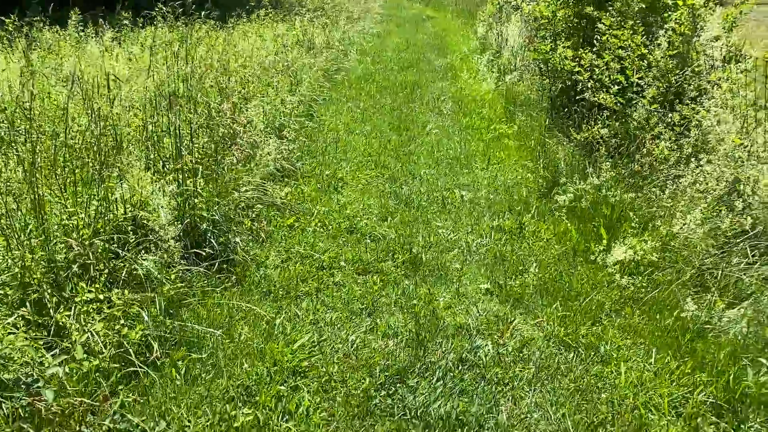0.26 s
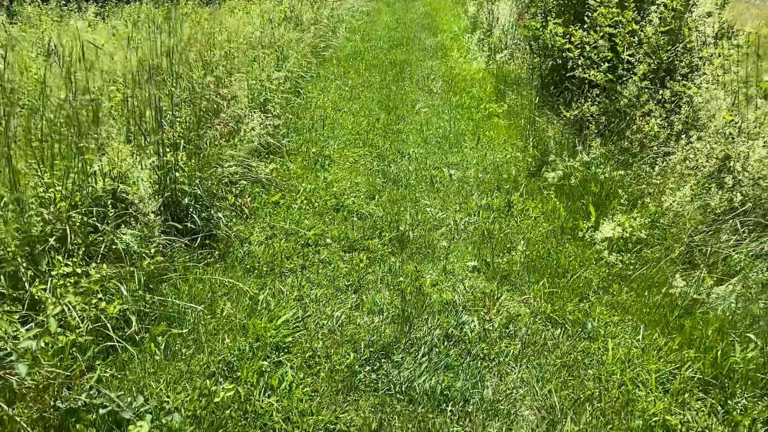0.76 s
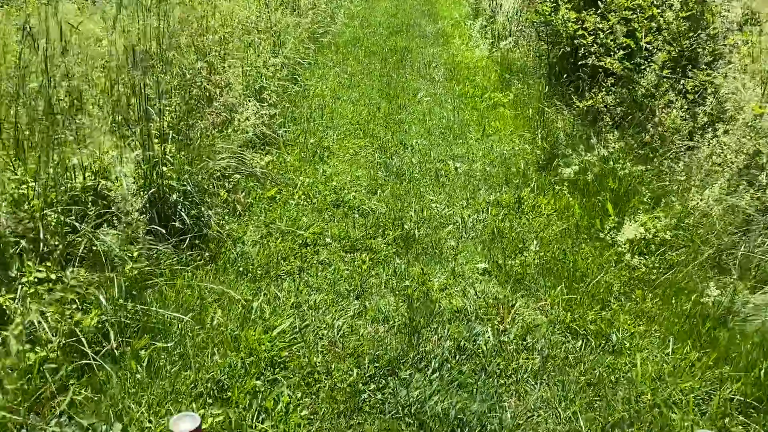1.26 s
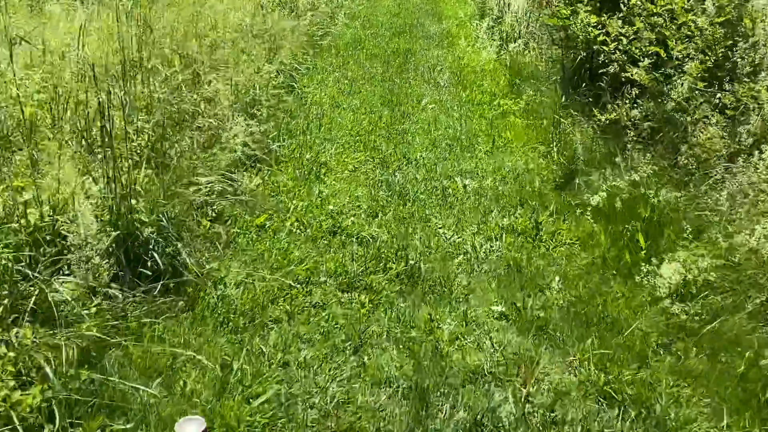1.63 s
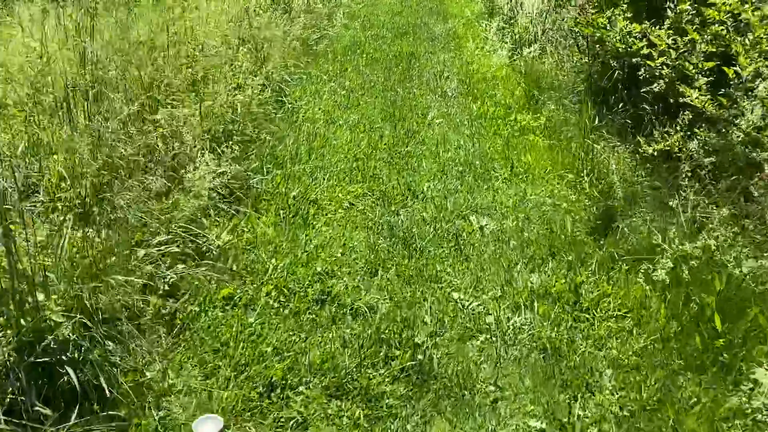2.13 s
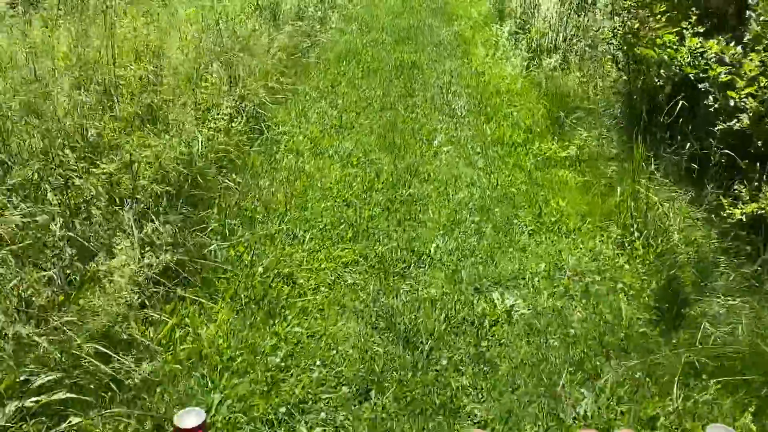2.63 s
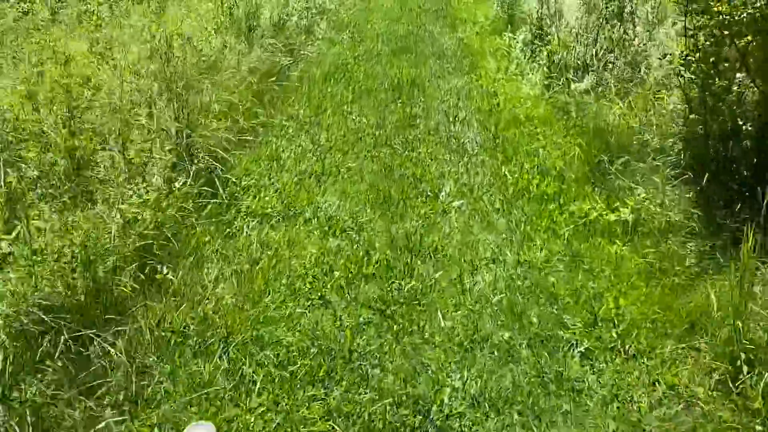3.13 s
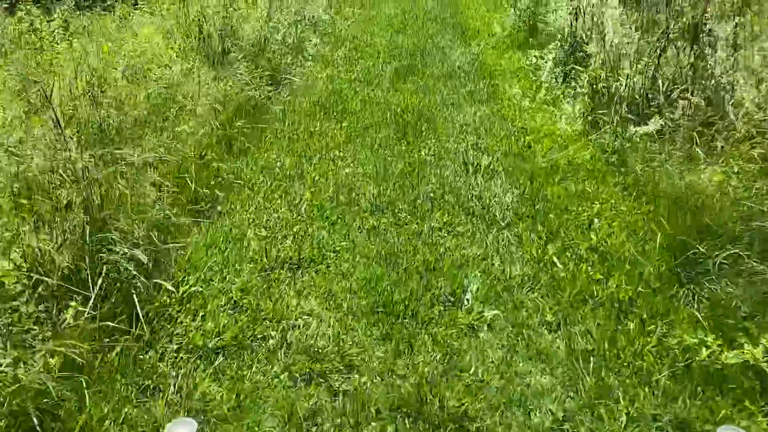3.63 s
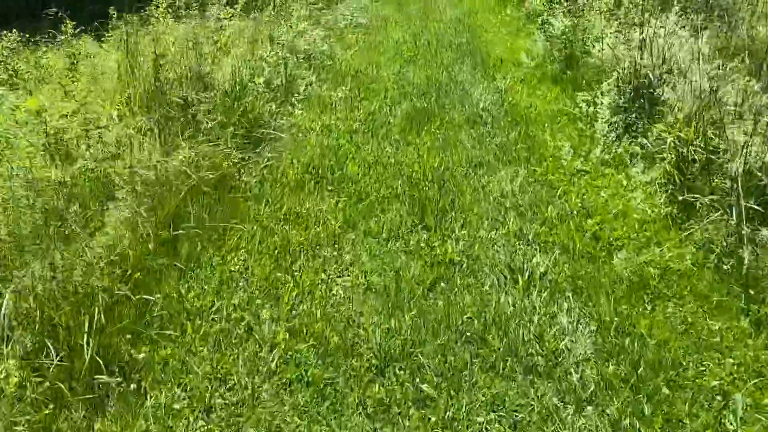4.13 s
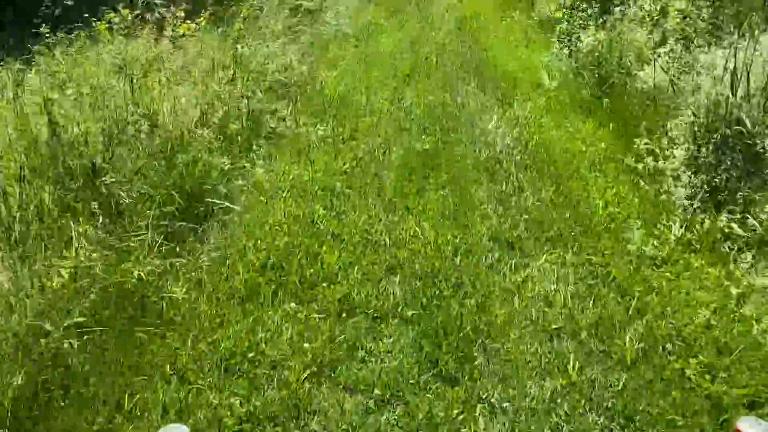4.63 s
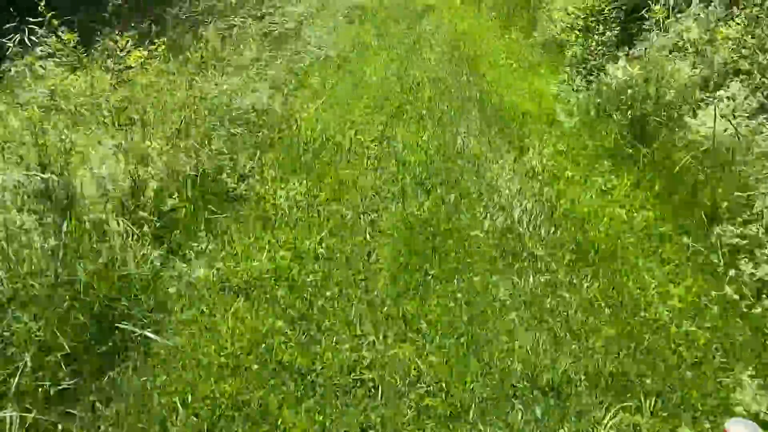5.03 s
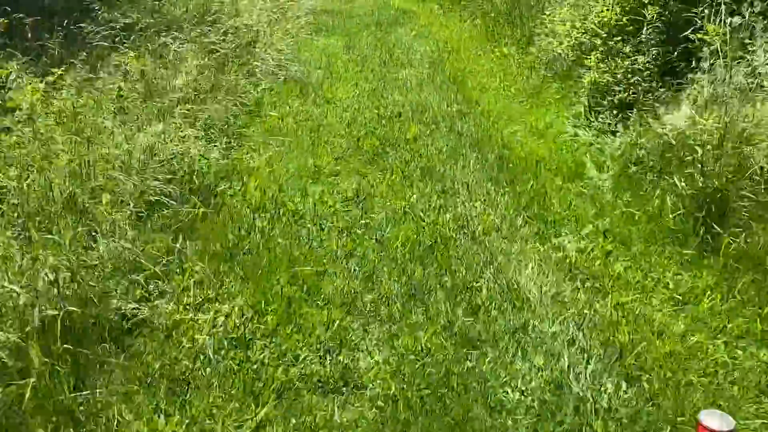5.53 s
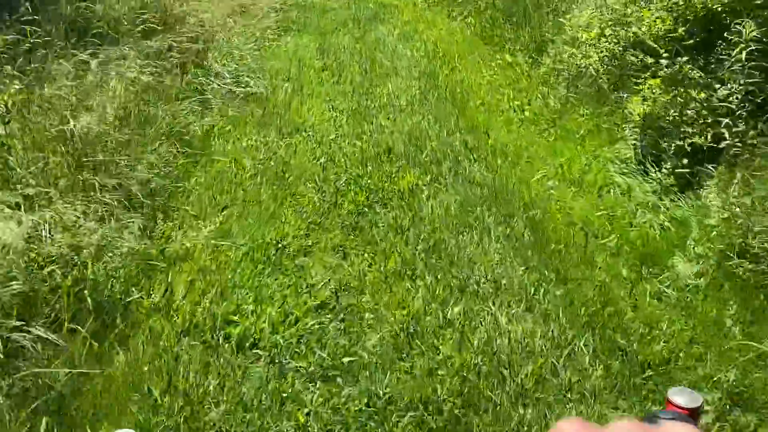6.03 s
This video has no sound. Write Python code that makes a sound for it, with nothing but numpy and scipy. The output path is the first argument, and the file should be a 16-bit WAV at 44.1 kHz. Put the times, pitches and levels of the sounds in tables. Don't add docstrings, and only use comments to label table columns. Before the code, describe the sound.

A ride-on mower runs throughout, heard from its seat outdoors on a phone, loud, close and slightly squashed at the peaks. The deck blades give a strong low hum near 110 Hz with buzzing overtones, beating slowly as three spindles drift apart. Under it lies a steady 58-59 Hz engine drone with a rough, uneven twin-cylinder texture. Wide low air roar and brighter blade rush surround it. From 0.6 s the pitch slides down slightly as grass thickens, lowest around 2.7 s, and the rush and hiss grow; it then partly recovers, wavering to the end. Faint hydraulic whines swell from about 0.6 to 3.4 s, with lower ones around 2.6-3.3 and 3.7-4.3 s and a last high touch near 4.6 s. Clippings hiss brightly, lifting at 0.9 s, most fully from 3 to 3.6 s, then briefly at 4.3 and 6.1 s. The drone continues to the cut at 6.3 s.

```python
import sys
import numpy as np
from scipy import signal
from scipy.fft import rfft, irfft, next_fast_len
from scipy.io import wavfile

SR = 44100
rng = np.random.default_rng(int(sys.argv[2]) if len(sys.argv) > 2 else 0)


def unload_audio(sound):
    columns = np.transpose(np.atleast_2d(sound))
    steps = np.round(np.clip(columns, -1, 1) * 32767)
    wavfile.write(sys.argv[1], SR, steps.astype(np.int16))


def attenuation_scalar(level_db):
    decades = np.asarray(level_db, float) / 20
    return 10 ** decades


N = 276948
SIDES = np.array([[1], [-1]])

# frequency_hz, share (0-1)
AIR_ALIKE = [(60, 0.54), (200, 0.81), (350, 0.9), (600, 0.26), (1000, 0.043), (2300, 0.33), (3400, 0.12),
             (4600, 0.76), (5800, 0.16)]
# frequency_hz, left_minus_right_db
PORT_TILT = [(60, -3), (110, -2), (200, 1.5), (380, -2), (700, -1.5), (1290, 4.5), (2380, 5), (4400, 4.5),
             (8120, 2.5), (15000, -1.5)]


def curves(table):
    time_s, *columns = np.transpose(table)
    return [np.interp(np.arange(N) / SR, time_s, column) for column in columns]


def on_log(table, hz):
    table_hz, values = np.transpose(table)
    return np.interp(np.log(hz + 1), np.log(table_hz), values)


def spells(rows, ramp_s):
    t = np.arange(N) / SR
    rise_db = 0
    for start_s, length_s, db in rows:
        nearest_end_s = np.minimum(t - start_s, start_s + length_s - t)
        rise_db = rise_db + db * np.clip(nearest_end_s / ramp_s + 0.5, 0, 1)
    return rise_db


def walk(rate, count=1, step=64):
    knots = rng.standard_normal((count, int(N / SR * 40) + 3))
    at = np.arange(N // step + 2) * step / SR * min(rate, 39)
    k = at.astype(int)
    ease = (1 - np.cos(np.pi * (at - k))) / 2
    return 1.15 * (knots[:, k] * (1 - ease) + knots[:, k + 1] * ease)


def fine(rows, step=64):
    rows = rows.astype(np.float32)
    part = np.arange(step, dtype=np.float32) / step
    filled = rows[:, :-1, None] + np.diff(rows)[:, :, None] * part
    return filled.reshape(len(rows), -1)[:, :N]


def turns(hz):
    return 2 * np.pi * np.cumsum(hz) / SR


def sing(rows, angle):
    angle = (angle % (2 * np.pi)).astype(np.float32)
    in_phase, quadrature = fine(rows).reshape(2, 2, N)
    return in_phase * np.cos(angle) + quadrature * np.sin(angle)


def smeared(angle, db, rate, steady, alike):
    both, apart = np.split(walk(rate, count=6), [2])
    alike = np.clip(alike, 0, 1)
    rows = np.sqrt(alike) * np.repeat(both, 2, axis=0) + np.sqrt(1 - alike) * apart
    rows[:2] += steady * np.sqrt(2)
    gains = np.tile(attenuation_scalar(db + 0 * SIDES), (2, 1)) / np.sqrt(1 + steady ** 2)
    return sing(rows * gains, angle)


def air(colour, share, octaves, flicker_db, rate):
    # frequency_hz, left_lead_half_turns
    port_lead = [(300, 0.15), (700, 0.35), (1400, 0.3), (2000, 0.5), (3400, 0.82), (4300, 0.13),
                 (5400, 0.42), (6800, 0), (7500, -0.6), (8550, -1), (10800, -2), (13250, -3), (15300, -3.5),
                 (15900, -1.5)]
    # centre_hz, width_hz, boost_db
    panels = [(549, 57, 4), (870, 63, 3), (1080, 61, 2), (610, 34, 0), (5430, 220, -1.5), (1230, 60, 0.5),
              (1440, 75, -3), (1530, 80, 2), (1880, 110, 3), (2470, 100, 2.5)]
    size = next_fast_len(N)
    hz = np.arange(size // 2 + 1) * SR / size
    both, left, right = rfft(rng.standard_normal((3, size), dtype=np.float32))

    share = np.clip(on_log(share, hz), 0, 1)
    lead = np.pi * np.interp(hz, *np.transpose(port_lead))
    pair = np.sqrt(share) * both * np.exp(0.5j * SIDES * lead)
    pair = pair + np.sqrt(1 - share) * np.array([left, right])

    ring_db = sum(db / (1 + (2 * (hz - f) / wide) ** 2) for f, wide, db in panels)
    colour_db = on_log(colour, hz) + ring_db + SIDES * on_log(PORT_TILT, hz) / 2
    pair = pair * attenuation_scalar(colour_db) * (hz < 15750) * (hz > 20)

    octave = np.clip(np.log2(hz / 25 + 1e-9), octaves[0], octaves[-1])
    out = 0
    for centre in octaves:
        window = np.clip(1 - abs(octave - centre), 0, 1)
        band = irfft((pair * window).astype(np.complex64), size)[:, :N]
        out = out + band * fine(attenuation_scalar(flicker_db * walk(rate)))
    return out / np.sqrt(np.mean(out ** 2))


def deck_roar(sag_hz):
    # frequency_hz, density_db (per Hz)
    roar_colour = [(25, -28), (45, -14), (75, -6), (130, -1), (250, 2), (450, 0.5), (580, -0.5),
                   (720, -4.5), (1000, -4), (1500, -12), (2500, -24.5), (4000, -39.5)]
    return attenuation_scalar(-20.5 + 0.92 * sag_hz) * air(roar_colour, AIR_ALIKE, range(7), 0.79, 9)


def blade_rush(sag_hz, clump_db, puff_db):
    # frequency_hz, density_db (per Hz)
    rush_colour = [(700, -12), (1500, 1), (2000, -1.2), (3000, -3), (4400, -8.5), (5300, -10),
                   (5800, -10.5), (6500, -18), (8000, -24)]
    level_db = -32.5 + 1.1 * sag_hz + 0.34 * clump_db + puff_db
    return attenuation_scalar(level_db) * air(rush_colour, AIR_ALIKE, range(6, 9), 0.9, 14)


def clippings(sag_hz, clump_db, puff_db):
    # frequency_hz, density_db (per Hz)
    hiss_colour = [(4000, -8.5), (6000, -4.5), (7000, -1.5), (9000, 2.5), (11000, -2.5), (13800, 2),
                   (14700, -8), (15800, -2)]
    # frequency_hz, share (0-1)
    hiss_alike = [(6000, 0.9), (7000, .92), (8400, 0.84), (10800, 0.97), (16000, .99)]
    swing_rad = 0.14
    hiss = air(hiss_colour, hiss_alike, range(8, 10), 0.5, 13) * fine(attenuation_scalar(0.93 * walk(14)))
    analytic = signal.hilbert(hiss.astype(np.float32), next_fast_len(N))[:, :N]
    spray = (analytic * np.exp(0.5j * SIDES * swing_rad * fine(walk(12)))).real
    return attenuation_scalar(-42.5 + 3.0 * sag_hz + clump_db + puff_db) * spray


def pump(angle):
    # piston_rate_multiple, resting_level_db, left_minus_right_db
    whine_tones = [(8, -54, 6), (10, -58.5, 6), (2, -50, -1)]
    # piston_rate_multiple, level_db, left_minus_right_db
    hum_tones = [(4, -51, 7), (5, -49.5, 9), (6, -52.5, -4), (7, -53, 5), (9, -54.5, 3), (15, -64, 11)]
    # start_s, length_s, rise_db
    effort = [
        [(.55, .75, 8.5), (1.38, .1, 6), (1.74, .22, 9.5), (2.42, .14, 12), (2.66, .2, 5), (3.55, 0.31, 7.5),
         (4.55, 0.18, 6)],
        [(.62, .3, 6), (.96, 0.14, 14.5), (1.75, .3, 8), (2.08, 0.18, 13), (2.45, 0.92, 6)],
        [(0, 0.34, 4), (2.6, .25, 17), (3.1, .2, 11), (3.7, .62, 14.5)],
    ]
    second_angle = 0.9932 * angle + 0.14 * fine(walk(25))[0]

    def shaft(multiple):
        return multiple * (angle if multiple < 8 else second_angle)

    out = 0
    for pushes, (multiple, db, pan_db) in zip(effort, whine_tones):
        tone = smeared(shaft(multiple), db + SIDES * pan_db / 2, 34, 2.0, 0.6)
        out = out + attenuation_scalar(spells(pushes, 0.077)) * tone
    for multiple, db, pan_db in hum_tones:
        out = out + smeared(shaft(multiple), db + SIDES * pan_db / 2, 12, 0.5, 0.5)
    return out


def engine(hz, angle):
    # cycles_per_two_turns, level_db (relative to the crank line)
    exhaust = [ (1, -26), (3, -13), (5, -10), (6, -13), (8, -11), (9, -8), (10, -8), (12, -11), (13, -11),
               (18, -14), (24, -14), (30, -14), (31, -17), (36, -15), (39, -21), (41, -22), (43, -20),
               (48, -22), (56, -23), (60, -23), (62, -21)]
    orders = 0
    for k, db in exhaust:
        tilt_db = SIDES * on_log(PORT_TILT, k * hz.mean() / 2) / 2
        orders = orders + smeared(k * angle / 2, db + tilt_db, 4, 0.48, 0.95 - k / 30)
    crank_line = np.sqrt(2) * np.cos(angle + 0.03 * SIDES)
    return attenuation_scalar(-27) * (crank_line + orders)


def blades(angle):
    # first_db, second_db, third_db
    spindles = [(-16, -24.5, -22), (-18.5, -50, -25), (-31, -19.5, -29), (-28, -27.5, -39.5)]
    # turn_rad, left_lead_rad, left_minus_right_db
    pulse = [(-0.031, 0.081, -0.5), (-1.9, 0.13, 0.5), (-1.78, .01, -1), (0.33, 0.12, -0.5)]
    # time_s, second_lead_passes, third_lead_passes
    slip = [(0.0, -0.1, 0.28), (0.52, -0.093, 0.21), (1.05, -0.122, 0.15), (1.57, -0.12, 0.096),
            (2.09, -0.14, -0.03), (2.62, -0.15, -0.13), (3.14, -0.15, -0.16), (3.66, -0.15, -0.33),
            (4.19, -0.129, -0.41), (4.71, -0.1, -0.46), (5.23, -0.11, -0.48), (5.76, -0.11, -0.63),
            (6.28, -0.11, -0.68)]
    # blade_multiple, level_db, left_minus_right_db
    upper = [(4, -33, -2.5), (5, -36, 0), (6, -39, 3.5), (7, -43, 0), (8, -45, 3), (10, -45, -1),
             (11, -47, -10), (12, -47, 13.5)]
    shake, throb_db = fine(walk(30, count=2))
    sway_db = fine(walk(5.5, count=4))
    leads = [np.zeros(N)] + curves(slip)
    out = 0
    for k, (levels_db, (turn, lead, pan_db)) in enumerate(zip(spindles, pulse), 1):
        beat = sum(attenuation_scalar(db) * np.exp(2j * np.pi * k * passes) for db, passes in zip(levels_db, leads))
        spin = np.exp(1j * (k * (angle + 0.031 * shake) + turn))
        tone = (beat * spin * np.exp(0.5j * SIDES * lead)).real
        drift_db = k * (0.31 * throb_db + 0.29 * sway_db[k - 1])
        out = out + np.sqrt(2) * attenuation_scalar(SIDES * pan_db / 2 + drift_db) * tone
    for k, db, pan_db in upper:
        out = out + smeared(k * angle, db + SIDES * pan_db / 2, 9, 0.34, 0.22)
    return out


def scene():
    # time_s, crank_hz
    crank = [(0, 59.3), (.6, 59.16), (1.4, 58.5), (2.2, 57.94), (2.75, 57.7), (3.3, 58.2), (3.8, 58.15),
             (4.4, 58.52), (5.3, 58.33), (5.7, 58.54), (6.28, 58.1)]
    # start_s, length_s, rise_db
    clumps = [
        (.9, .15, 2),
        (2.1, .15, 0.5),
        (2.95, 0.627, 2),
        (3.15, .15, 2),
        (4.32, .12, 1.5),
        (5.4, .3, -0.5),
        (6.05, .25, 1),
    ]
    hz, = curves(crank)
    angle = turns(hz)
    sag_hz = 59.2 - hz
    clump_db = spells(clumps, 0.04)
    puff_db = 0.42 * (np.cos(angle / 2) + np.cos(angle))

    mix = deck_roar(sag_hz) + blade_rush(sag_hz, clump_db, puff_db)
    mix = mix + clippings(sag_hz, clump_db, puff_db)
    mix = mix + pump(6.5 * angle)
    mix = mix + engine(hz, angle)
    return mix + attenuation_scalar(0.61 - 0.9 * sag_hz) * blades(1.8572 * angle)


def top_cut(x):
    return signal.sosfilt(signal.butter(12, 15750, fs=SR, output="sos"), x)


def record(dry):
    wet = np.tanh(0.73 * dry) / 0.71
    high_pass = signal.butter(8, 14850, "high", fs=SR, output="sos")
    side_top = signal.sosfiltfilt(high_pass, wet[0] - wet[1])
    return top_cut(wet - SIDES * side_top / 2)


dry = scene()
out = record(dry)
unload_audio(out)
```